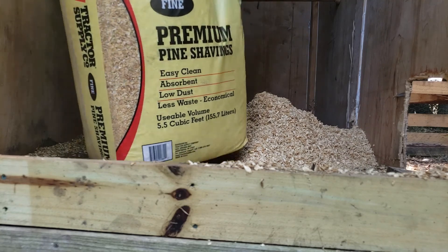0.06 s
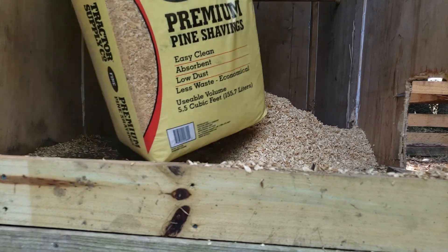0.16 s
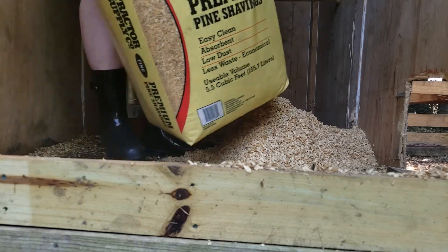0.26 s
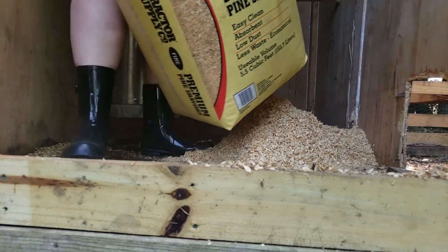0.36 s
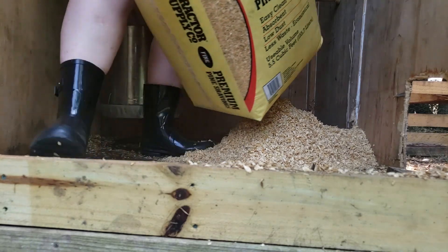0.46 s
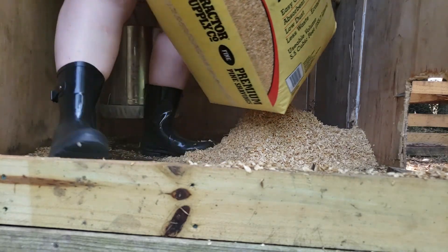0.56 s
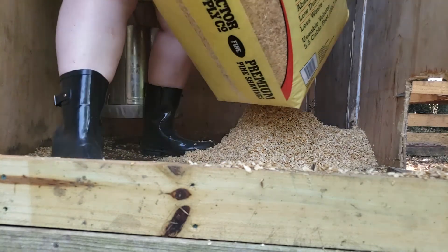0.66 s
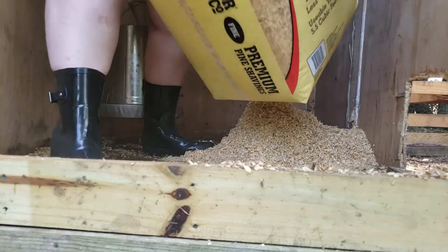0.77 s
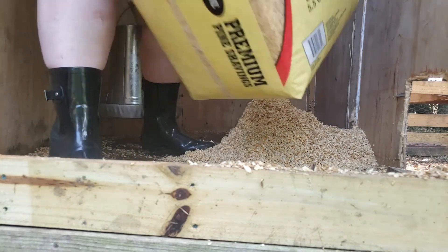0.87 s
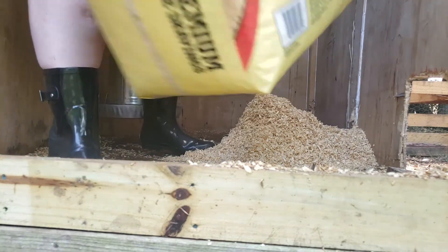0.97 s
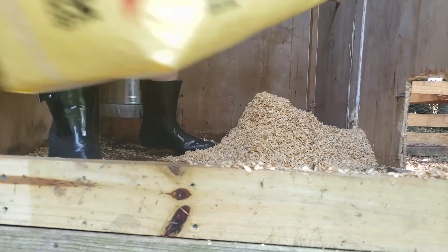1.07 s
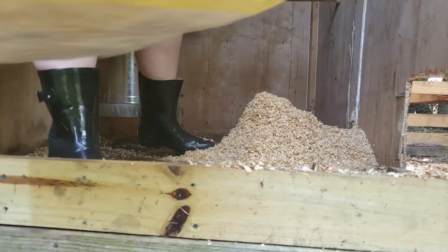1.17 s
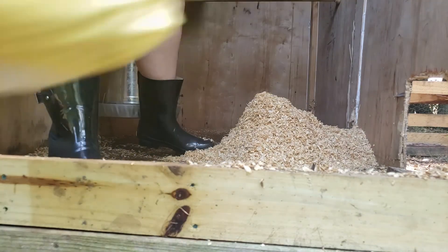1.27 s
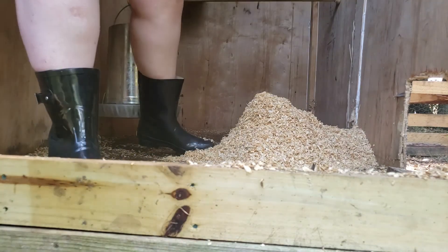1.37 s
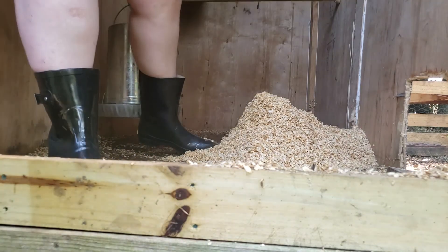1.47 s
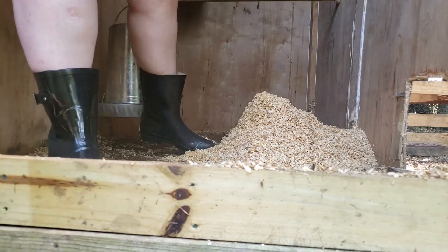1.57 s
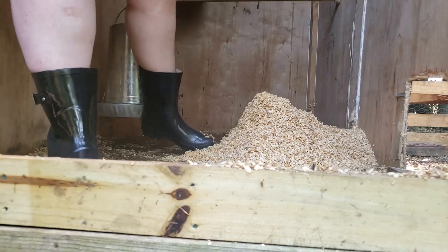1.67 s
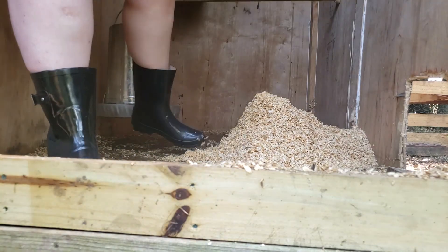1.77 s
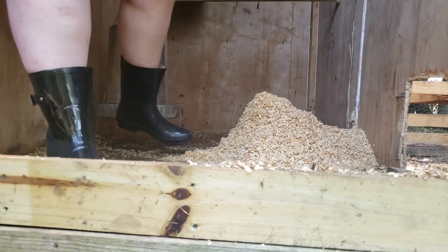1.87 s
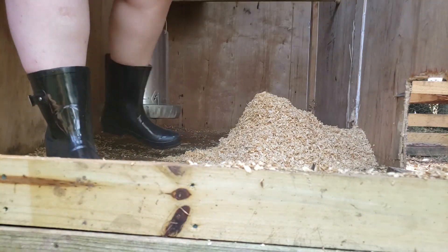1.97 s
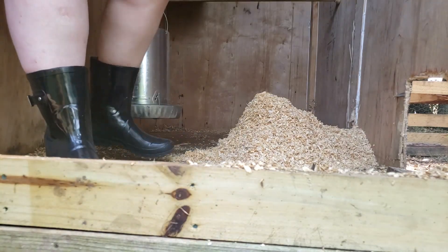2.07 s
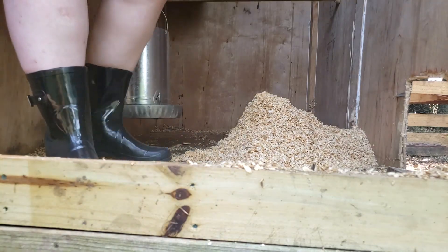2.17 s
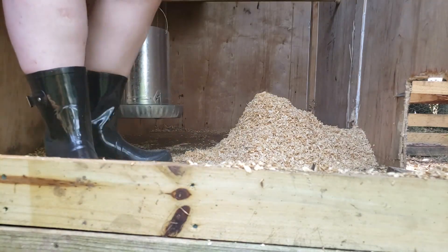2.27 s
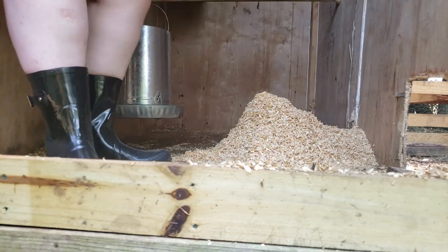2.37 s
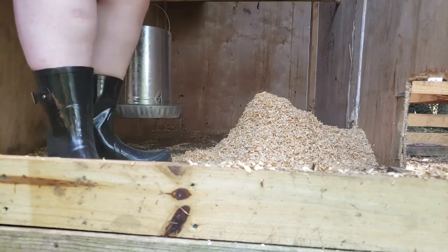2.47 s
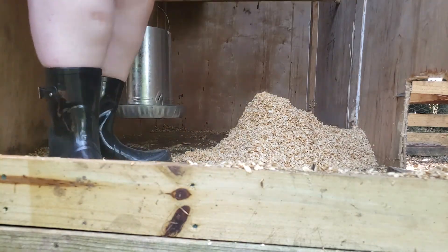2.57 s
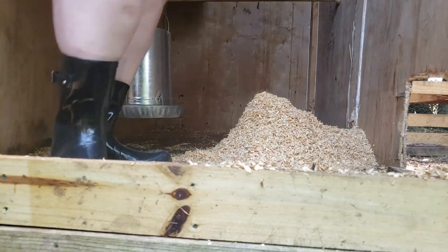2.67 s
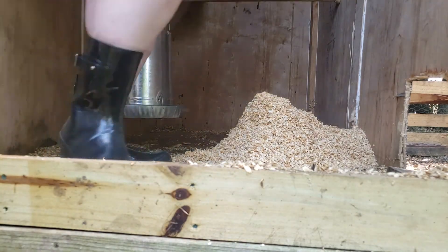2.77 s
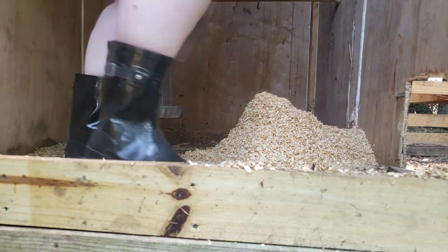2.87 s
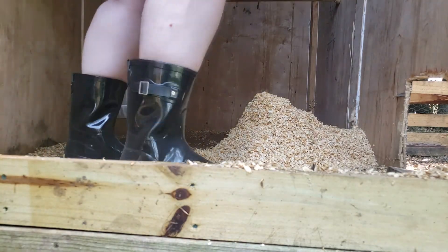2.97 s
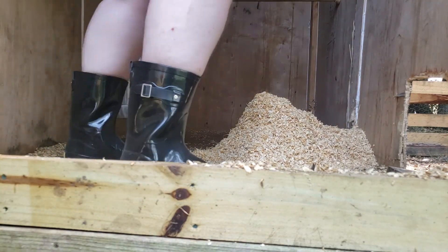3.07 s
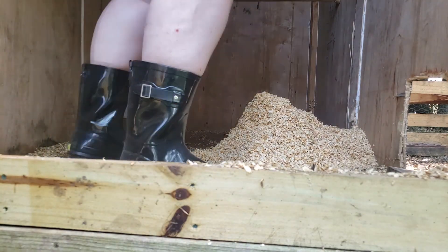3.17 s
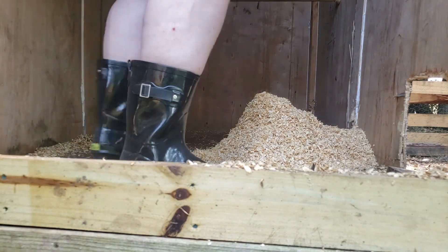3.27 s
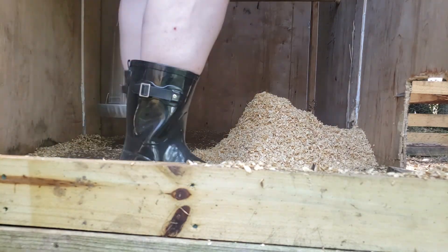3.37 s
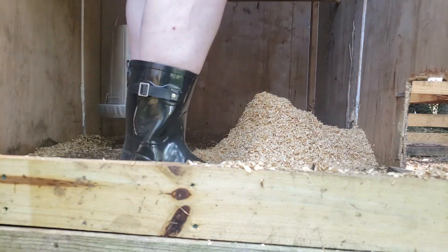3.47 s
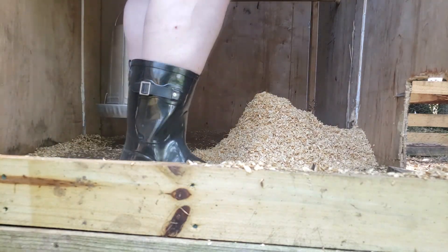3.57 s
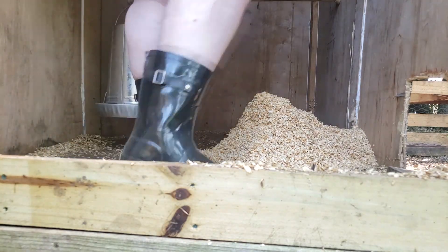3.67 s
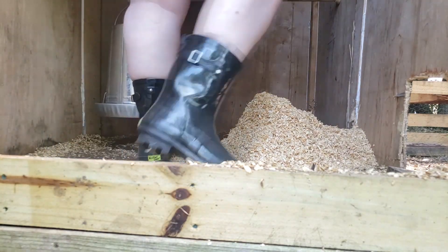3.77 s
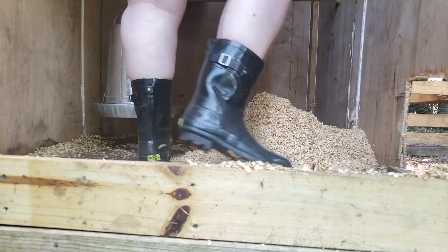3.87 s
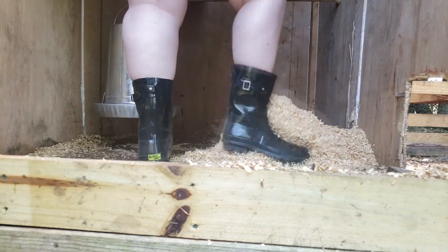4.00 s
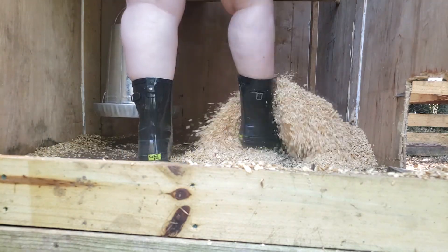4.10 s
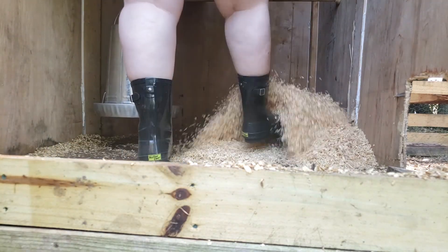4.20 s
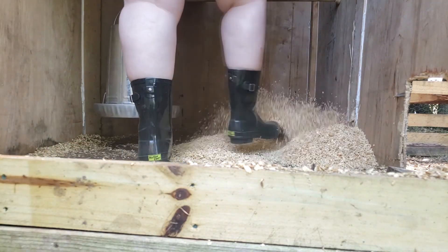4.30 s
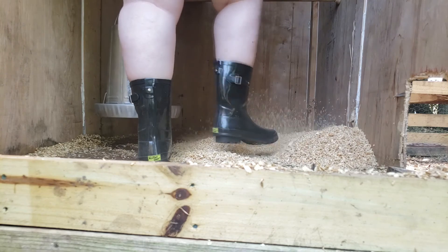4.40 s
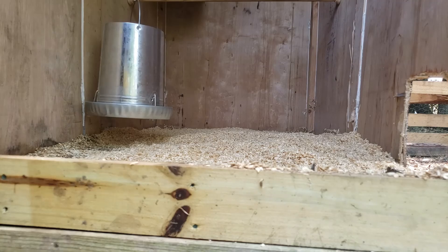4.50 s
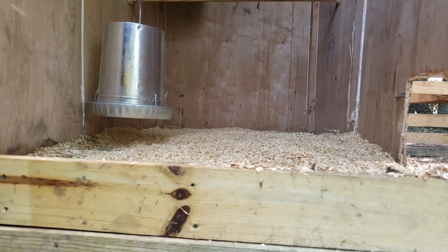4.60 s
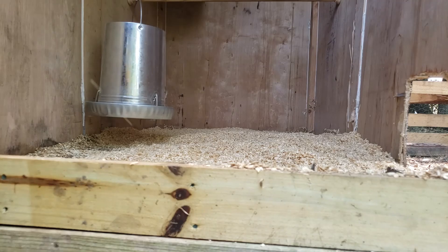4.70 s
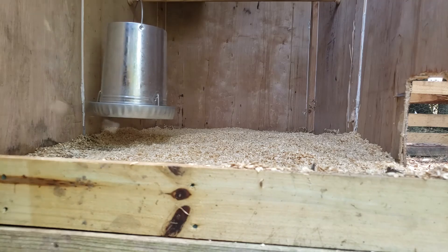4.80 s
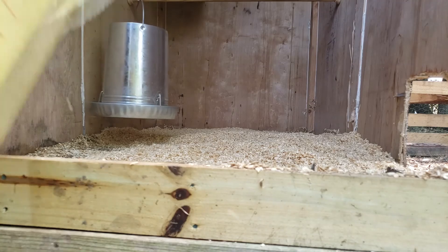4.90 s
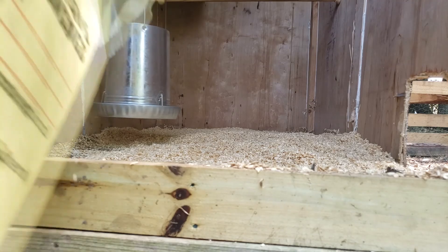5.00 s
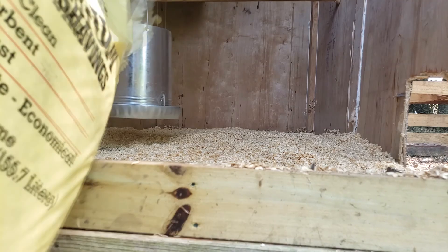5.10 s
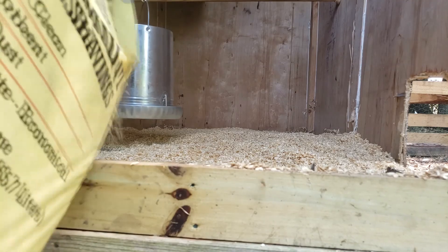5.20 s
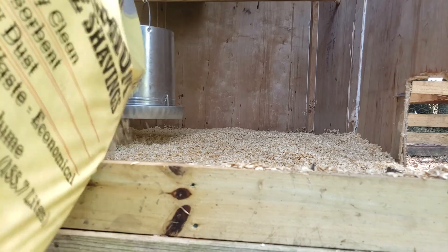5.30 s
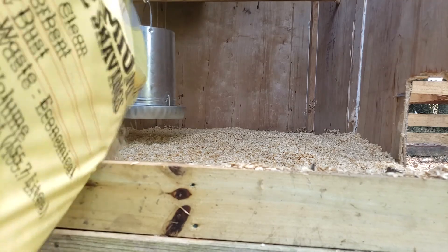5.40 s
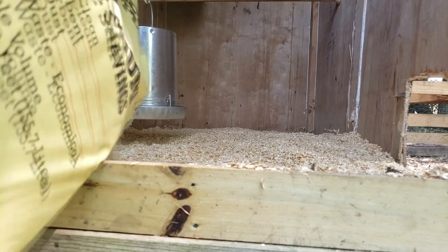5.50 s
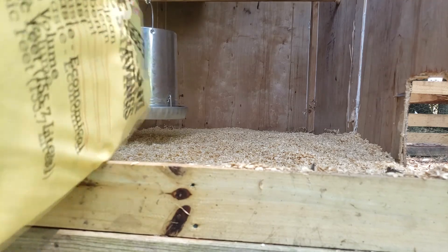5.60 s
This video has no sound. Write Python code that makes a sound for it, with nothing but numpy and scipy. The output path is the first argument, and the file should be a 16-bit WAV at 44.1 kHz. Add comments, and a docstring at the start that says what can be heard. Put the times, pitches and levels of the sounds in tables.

```python
"""A small wooden coop hums low while insects hiss far off. A plastic sack of fine shavings is lifted and
emptied: folds snap, chips rustle, and a hanging tin feeder, nudged, rings faintly. The sack is tossed
aside and thumps on the floor. The feeder rings once more as rubber boots start to step about; then they
kick the heap flat. Last, a new sack is shaken out. The left microphone port is nearer to all of it."""
import sys
import numpy as np
from scipy import signal
from scipy.fft import rfft, irfft, next_fast_len
from scipy.io import wavfile
from scipy.ndimage import uniform_filter1d, map_coordinates

SR = 44100
rng = np.random.default_rng(int(sys.argv[2]) if len(sys.argv) > 2 else 0)


def transcribe(u):
    """Save the signal u as a 16-bit wav file named by the first command-line argument.

    u: samples, shape (n,) or (channels, n), limited to [-1, 1]; the rate is SR.
    q: integer samples, one column per channel.
    """
    v = np.clip(np.atleast_2d(u).T, -1, 1)
    q = np.round(v * 32767).astype(np.int16)
    wavfile.write(sys.argv[1], SR, q)


N = 249165

# Fader rides of the low bed: (time [s], hum level [dB], floor boom level [dB])
BED_LEVELS = [(0, -45, -53), (.25, -42, -55), (.47, -45, -43), (.79, -45, -47), (1.13, -42, -55),
              (1.48, -41.5, -53), (1.9, -49, -52), (2.33, -45.5, -54.5), (2.8, -47.5, -59.5),
              (3.19, -44.5, -52), (3.65, -46, -58.5), (4.06, -42.5, -54), (4.45, -43.5, -51),
              (4.69, -41, -39), (4.85, -45, -39.5), (5.18, -49, -39), (5.4, -42.5, -46), (5.65, -50, -38.5)]
# Air modes of the coop: (frequency [Hz], width [Hz], gain [dB])
AIR_MODES = [(53.4, 9, 1.5), (104.8, 10, 1.5), (137.7, 14.6, -3), (207, 55, -26), (366, 7.1, -17.5)]
# Hollow modes of the raised floor: (frequency [Hz], width [Hz], gain [dB])
PLANK_MODES = [(330, 25, -2.5), (462, 110, 2.5), (610, 190, 2.5), (777, 55, -8)]
# Tone of the outdoor drone: (frequency [Hz], relative level [dB])
DRONE_EQ = [(20, -35), (38, 2.5), (140, -10.5), (165, -34), (300, -28.5), (600, -37), (1200, -63.5),
            (3000, -78.5)]
# Tone of the booming joists: (frequency [Hz], relative level [dB])
BOOM_EQ = [(41, -39), (70, 2), (97, 4), (140, -4), (204, -3), (232, -8), (300, -14), (390, -38),
           (660, -120)]
# Tone of the distant air: (frequency [Hz], relative level [dB])
OUTDOOR_EQ = [(290, -20), (500, 1.5), (769, -23.5), (831, -10.5), (888, -20.5), (1940, -19.5),
              (7000, -10.5), (9100, -52.5), (15400, -120)]
# Tone of the far insects: (frequency [Hz], relative level [dB])
INSECT_EQ = [(6500, -32.5), (7600, -7.5), (8700, -3.5), (9700, -5.5), (11100, -3), (12000, -9),
             (13500, -11.5), (15700, -14)]
# Tone of the floorboards: (frequency [Hz], relative level [dB])
BOARD_EQ = [(150, -9), (250, -1), (426, -5), (459, -4.5), (495, -3.5), (615, -4), (901, -6.5),
            (1500, -14.5), (1950, -24), (3300, -120)]
# Tone of coarse chips: (frequency [Hz], relative level [dB])
COARSE_EQ = [(590, -22.5), (1000, -2), (1190, -1), (1320, -3), (2310, -2.5), (3500, -5), (4550, -14.5),
             (7700, -120)]
# Tone of fine chips: (frequency [Hz], relative level [dB])
FINE_EQ = [(2060, -18), (3500, -8), (4150, -2.5), (5450, -3), (7010, -2.5), (8000, -7), (10400, -51.5),
           (17600, -120)]
# Tone of sliding dust: (frequency [Hz], relative level [dB])
DUST_EQ = [(5000, -31), (8500, -6.5), (9690, -5), (12000, -2), (15100, -2.5), (15700, -1)]
# Reverb of the plank walls: (frequency [Hz], t60 [s])
WALL_DECAY = [(200, 0.21), (2000, 0.29), (10000, 0.12)]
# Stereo likeness of the noise: (frequency [Hz], left-right correlation [0-1])
CORRELATION = [(60, 1), (290, 0.9), (700, 0.99), (1500, 0.14), (3000, 0.043), (7000, 0.072)]
# Modes of the tin feeder: (frequency [Hz], rim hit level [dB], drum hit level [dB], t60 [s])
FEEDER_MODES = [(4200, -4, -20, 2.5), (4630, 0, -14, 3), (5665, -2, -4, 4), (6285, -9, -2, 2),
                (6790, -4, -1, 2), (7192, -1, -4, 3), (7295, -3, -6, 3), (7715, -5, -7, 3)]
# Nudges of the feeder: (time [s], level [dB], spot [0 rim, 1 drum])
FEEDER_NUDGES = [(.67, -72, 0), (2.212, -74, 1)]
# Soles and sack landing: (time [s], level [dB], pitch [Hz], relative knock level [dB], t60 [s])
LANDINGS = [(0.159, -27, 137, -10.5, 0.087), (0.259, -31.5, 53.8, -3, 0.11), (0.468, -34, 118, -29.5, 0.11),
            (0.62, -32.5, 134.6, -31, 0.27), (1.269, -35.5, 59, -1, 0.11), (1.583, -21.5, 98, 0.5, 0.098),
            (1.598, -15.5, 68.6, -6, 0.12), (1.592, -21, 191, -25, 0.065), (1.611, -23, 100, -21, .07),
            (1.81, -34, 98, -10, 0.11), (2.199, -37, 51.7, -15, 0.18), (2.287, -36.5, 118.5, -13, 0.22),
            (2.499, -37, 143, -14, .11), (2.56, -33.5, 70, -5.5, 0.041), (2.628, -35.5, 99, -8, 0.14),
            (2.72, -43, 98, -2.5, 0.16), (2.916, -38.5, 93, -28, .12), (3.086, -41, 134.2, -26, 0.53),
            (3.398, -41, 136.4, -27, .15), (3.579, -42, 84, -10.5, 0.19), (3.689, -39, 51.1, -30.5, 0.089),
            (4.529, -27, 78.6, -6, 0.13), (4.64, -26.5, 91, -23, 0.12), (4.726, -35, 90.5, -13, 0.096),
            (4.849, -26, 85, -15, 0.089), (5.088, -30, 89.5, 2.5, 0.11), (5.115, -34, 200, 0, 0.083),
            (5.187, -21, 82.4, -18, 0.072), (5.299, -24, 186, -6, 0.049), (5.395, -28, 98, -26, 0.14),
            (5.47, -23, 94, -3.5, 0.062), (5.547, -24, 95, -10, 0.065), (5.578, -28, 60, -26, 0.14),
            (5.63, -12, 75, -26, 0.045)]
# Snaps of plastic and crushed chips: (time [s], level [dB], colour [Hz], relative treble level [dB])
SNAP_CUES = [(0.0512, -25, 1620, -4), (0.0761, -25, 4680, 6.5), (0.122, -35, 1550, -20),
             (0.613, -33, 3880, -24), (0.6691, -31, 6130, -16), (0.837, -29.5, 6650, -23.5),
             (1.245, -37, 6360, -23), (1.261, -33, 4930, -19), (1.2801, -28, 1550, -20.5),
             (1.3127, -36, 1646, -4.5), (1.481, -36, 6300, -16.5), (1.507, -32.5, 6500, -12),
             (1.575, -22.5, 3600, 3), (1.5891, -13.5, 1980, -10), (1.593, -10, 1990, -14.5),
             (1.5995, -10.5, 6030, -23.5), (1.6327, -17.5, 1990, -10), (1.7593, -28, 4070, -17.5),
             (1.779, -34, 2010, -7), (1.7928, -29, 4360, -0.5), (1.8203, -32.5, 2260, -16),
             (2.0748, -37, 1770, -24.5), (2.2132, -42, 2300, -16.5), (2.5623, -44.5, 2130, -4.5),
             (2.6265, -38.5, 2880, -19.5), (2.6544, -41, 3030, -14), (3.083, -44, 1500, -19),
             (3.1042, -38, 2170, -23), (3.1175, -44, 2320, -17), (3.577, -43, 2860, -20),
             (3.5854, -36.5, 1770, -16), (3.6268, -43, 1200, -25), (3.684, -38.5, 1680, -22),
             (4.497, -22, 6900, -18), (4.5199, -22, 2360, -21.5), (4.5331, -18, 2530, -23),
             (4.5617, -18.5, 4530, -7), (4.6174, -23.5, 2650, -22.5), (4.7217, -12, 6760, -17),
             (4.738, -18.5, 6500, -24), (4.7514, -28, 3260, -16), (4.7592, -18, 7200, -21),
             (4.7635, -16, 5340, -13), (4.794, -28.5, 3390, -12.5), (4.8307, -23.5, 4280, -6),
             (4.8345, -22, 3330, -7.5), (4.8566, -23.5, 5000, -3), (4.8803, -19.5, 6300, -24),
             (4.8947, -24.5, 3610, -23), (5.005, -26.5, 1750, -21), (5.0175, -25.5, 4000, -17),
             (5.0384, -21, 5200, 0.5), (5.0665, -21.5, 4380, -2), (5.0736, -19, 2280, -13.5),
             (5.1145, -31.5, 5000, 0), (5.132, -18, 4230, -12.5), (5.1674, -25.5, 4750, -17),
             (5.189, -28.5, 4850, -15.5), (5.2473, -25.5, 2480, -13), (5.3015, -18.5, 2290, -19),
             (5.5344, -23, 4960, -1), (5.632, -20, 6000, -13)]
# Swells of sack or boot; rise and fall span 20 dB and are held to at least 3 ms:
# (peak time [s], coarse level [dB], rise [s], fall [s], then over coarse: fine [dB], dust [dB], rub [dB])
MOVEMENTS = [(.01, -45.5, -0.5, 0.15, -5.5, -0.5, -2), (.08, -46.5, 0.4, 0.11, 0, 0.5, 0),
             (0.196, -49, .05, 0.2, -4.5, 2, 0), (0.253, -54, -0.33, 0.16, 2, 2, 1.5),
             (.34, -59.5, 0.9, 0.1, -1, 0.5, 1.5), (0.389, -63, -0.3, 0.75, 3.5, 6.5, -3),
             (.51, -58.5, .12, 0.34, -2, 6.5, 3.5), (0.615, -52.5, -0.1, 0.15, -8, 0, 1),
             (0.674, -52, -0.06, 0.0147, -0.5, 7, 13), (.76, -74, -2.1, .3, 1.5, 11, 12),
             (0.84, -55, 0.15, -0.03, -15, 0, 2.5), (.96, -72, 0.1, 0.5, 5, 15.5, -3),
             (1.13, -67.5, 0.25, .2, 0.5, 9, 9), (1.28, -59, 0.1, 0.05, 4, 3.5, 8),
             (1.332, -49.5, 0.12, 0.08, -6, 3.5, 1), (1.385, -51.5, 0.15, 0.13, 3, 8.5, 5),
             (1.5, -54.5, 0.12, 0.04, -3, 1.5, 2), (1.578, -36, 0.03, 0.02, -8, 3.5, 4),
             (1.594, -28, 0.0278, 0.0269, 4, 6.5, -2.5), (1.636, -32.5, 0.0465, 0.0449, -1, 0, -6.5),
             (1.679, -45.5, 0.08, .15, -5, 0, 2.5), (1.765, -55, 0.42, 0.09, -2, 3.5, -13),
             (1.879, -45, 0.14, 0.07, -3, -2, -4), (1.975, -54.5, 0.13, 0.06, -9, -7.5, -2),
             (2.022, -53.5, 0.44, 0.04, -1.5, 2.5, -3), (2.08, -63.5, 0.7, 0.35, 0, 6.5, 2),
             (2.2, -72, -0.2, 0.04, 3, 3.5, 16), (2.22, -64.5, .02, 0.16, -0.5, 3.5, 8),
             (2.45, -87.5, 0, .6, 13, 25, 6), (2.498, -69, -0.63, 0.54, -3.5, 1, 10),
             (2.565, -63.5, .015, 0.14, -5, 0, 6), (2.65, -56, 0.06, 0.07, -5, -2, -4),
             (2.73, -72.5, 0.1, 0.2, -10, 1.5, 6.5), (2.923, -58.5, -0.01, 0.12, -2, 2.5, 2),
             (3.085, -65.5, 0.07, 0.22, -12, -12, 6.5), (3.11, -58.5, 0.05, 0.17, -9, -15, 5),
             (3.41, -72, -0.1, 0.1, 2, 9.5, -9), (3.45, -72.5, 0.3, 0, -6, 5.5, -5),
             (3.584, -58.5, 0.03, 0.12, -7.5, -3, 7.5), (3.69, -67.5, 0.32, 0.3, -5, -8, 5),
             (3.769, -76.5, 0.9, -1.5, -3.5, 3, 1), (3.925, -55.5, 0.0064, 0.6, 6.5, 11.5, -3.5),
             (3.96, -47.5, 0.04, .1, 2.5, 8, -4.5), (4.01, -42.5, 0.05, 0.2, -3.5, 2.5, -3),
             (4.16, -52, 0.196, 0.9, 2.5, 7.5, -5.5), (4.268, -42.5, 0.05, .2, 2.5, 7.5, -9.5),
             (4.38, -42, 0.15, 0.12, 4.5, 10.5, -6.5), (4.465, -49.5, 0.0744, .025, 5.5, 13.5, 2),
             (4.5, -46, -0.21, -0.25, 13, -0.5, -6), (4.543, -41, 0.0662, .06, 1.5, 6, -0.5),
             (4.62, -44.5, 0, -0.1, 0, -4.5, -15), (4.681, -48.5, 0.1262, .08, 3, 11, 3.5),
             (4.73, -36.5, 0.0532, .09, -3.5, -2.5, -2), (4.836, -46, 0.12, 0.15, -5, -0.5, -4),
             (4.884, -40.5, 0.13, .11, -2, -3, 0), (5.04, -41.5, 0.11, 0.4, -1.5, 3.5, -1),
             (5.09, -43.5, 0.09, 0.14, 1, 2.5, 4), (5.168, -44.5, 0.16, 0.18, 0.5, 1.5, 5.5),
             (5.26, -48.5, 0.26, 0, 0, 6, 4), (5.3, -40, 0.02, 0.1, -20, -7.5, 1),
             (5.34, -58, 0.2, 0.5, 6.5, 9, -1), (5.41, -42.5, -0.25, -0.03, -11, -4.5, -2),
             (5.47, -48, 0.26, 0.03, 1, 8, 1.5), (5.54, -45.5, 0.18, 0.3, -1.5, 3, -1),
             (5.626, -43.5, 0.17, .08, -1, -2, 3)]
# Where the shavings are stirred: (time [s], left over right [dB])
STIR_PAN = [(0, 4.5), (.85, 5), (1, 8), (1.4, 3), (1.55, 8.5), (2, 9), (2.4, 5.5), (3.1, 5.5), (3.3, 6),
            (4.04, 4), (4.67, 5), (5.65, 4.5)]
# Loose shavings slide smoothly, stiff plastic jerks: (time [s], jerkiness [0-1])
JERKINESS = [(0, .6), (1.2, .6), (1.75, .5), (2.1, .3), (3.85, .3), (3.9, .08), (4.47, .08), (4.5, .9),
             (4.95, .9), (5.3, .6), (5.65, .6)]

LEAD_S = 12 / SR  # the left port hears first
TOP_HZ = 15760


def amp(db):
    return 10 ** (np.asarray(db) / 20)


def unit(x):
    return x / np.sqrt(np.mean(x ** 2) + 1e-20)


def along(points, hz):
    """(Hz, value) points on a log axis."""
    f, v = np.transpose(points)
    return np.interp(np.log(hz + 1), np.log(f + 1), v)


def curves(rows):
    """One value per sample for each column after the time."""
    s, *cols = np.transpose(rows)
    return [np.interp(np.arange(N) / SR, s, c) for c in cols]


def wobble(rate):
    """A smooth random curve, rate knots a second."""
    return map_coordinates(rng.standard_normal(N // 100), [np.arange(N) * rate / SR])


def filtered(x, response):
    """x times a complex response of frequency."""
    m = next_fast_len(x.shape[-1] + min(8192, 3 * x.shape[-1]))
    return irfft(rfft(x, m) * response(np.fft.rfftfreq(m, 1 / SR)), m)[..., :x.shape[-1]]


def resonance(f, hz, width):
    return 1j * f * width / (hz * hz - f * f + 1j * f * width)


def eq_curve(points):
    return lambda hz: amp(along(points, hz))


def sides(left_db):
    """Left and right gain rows whose mean is 1."""
    pair = amp(np.vstack([left_db / 2, -left_db / 2]))
    return 2 * pair / pair.sum(0)


def spread(pair, colour, lead_s=LEAD_S):
    """Colour two unrelated signals and blend them into partly alike channels of overall rms 1."""
    size = next_fast_len(pair.shape[1] + 8192)
    hz = np.fft.rfftfreq(size, 1 / SR)
    mid, side = rfft(pair, size)
    angle = np.arccos(along(CORRELATION, hz)) / 2
    sign = np.array([[1], [-1]])
    blend = np.cos(angle) * mid + sign * np.sin(angle) * side
    time_shift = np.exp(1j * np.pi * hz * lead_s * sign)
    return unit(irfft(blend * colour(hz) * time_shift, size)[:, :pair.shape[1]])


def spread_noise(colour, lead_s=LEAD_S, length=N):
    return spread(rng.standard_normal((2, length)), colour, lead_s)


def outdoor_hiss():
    """Distant air and insects make a smooth, nearly steady hiss."""
    air = amp(-75.5 + .4 * wobble(4.9)) * spread_noise(eq_curve(OUTDOOR_EQ), lead_s=0)
    insects = amp(-62 + .4 * wobble(4.3)) * spread_noise(eq_curve(INSECT_EQ), lead_s=0)
    return air * sides(10) + insects * sides(2)


def air_colour(f):
    """The enclosed air lifts a few low bands."""
    return np.abs(sum(amp(db) * resonance(f, hz, width) ** 2 for hz, width, db in AIR_MODES))


def coop_hum(rub_gain):
    """Outdoor drone swells in the coop's air modes; the joists boom under weight and with every rub."""
    hum_db, boom_db = curves(BED_LEVELS)
    hum_gain = amp(hum_db + 1.9 * wobble(7.4))
    hum = spread_noise(lambda f: amp(along(DRONE_EQ, f)) + 1.06 * air_colour(f), LEAD_S / 3)
    boom_gain = np.hypot(amp(boom_db), rub_gain) * amp(1.2 * wobble(7.2))
    boom = spread_noise(lambda f: amp(along(BOOM_EQ, f)) * (1 + .38 * air_colour(f)))
    return (hum_gain * hum + boom_gain * boom) * sides(3.8)


def walls(send):
    """The plank walls answer with a short tail, each frequency dying at its own speed."""
    hz, t, spectrum = signal.stft(rng.standard_normal((2, SR // 3)), SR, nperseg=256)
    decay = amp(-60 * t / along(WALL_DECAY, hz)[:, None])
    tail = signal.istft(spectrum * decay, SR, nperseg=256)[1]
    predelayed = np.pad(send, ((0, 0), (200, 0)))
    return signal.fftconvolve(predelayed, tail / np.linalg.norm(tail[0]), axes=1)[:, :N]


def feeder():
    """Thin sheet metal sings on after each nudge, wavering as it swings, until it is damped."""
    out, t = np.zeros((2, N + SR)), np.arange(SR * 3 // 5) / SR
    for start, db, on_drum in FEEDER_NUDGES:
        damping = np.clip((1 if on_drum else 3) * (1 - t / t[-1]), 0, 1)
        for hz, rim_db, drum_db, t60 in FEEDER_MODES:
            phase = rng.uniform(0, 2 * np.pi, (2, 1)) + np.cumsum(.017 * rng.standard_normal(len(t)))
            ring_gain = amp(db + (drum_db if on_drum else rim_db) - 60 * t / t60) * damping
            out[:, round(start * SR):][:, :len(t)] += ring_gain * np.sin(2 * np.pi * hz * t + phase)
    return out[:, :N] * sides(12)


def board_colour(f):
    """The floor's broad tone with the planks' modes standing out."""
    planks = sum(amp(db) * resonance(f, hz, width) for hz, width, db in PLANK_MODES)
    return amp(along(BOARD_EQ, f)) * (1.7 + np.abs(planks))


def thuds(joist_hz=203, joist_db=-11, crunch_db=-29.5):
    """A soft landing swings the floor for a few cycles, rings a joist, knocks boards and crushes chips."""
    out, t = np.zeros((2, N + SR)), np.arange(SR // 4) / SR
    hit_shape = lambda t60, attack_s: amp(-60 * t / t60) * (1 - np.exp(-t / attack_s))
    for start, db, hz, knock_db, t60 in LANDINGS:
        swing = np.sin(2 * np.pi * hz * t) + amp(joist_db) * np.sin(2 * np.pi * joist_hz * t)
        swing *= hit_shape(t60, .00082)
        knock = amp(knock_db) * spread_noise(board_colour, length=len(t)) * hit_shape(.27 * t60, .001)
        crunch = amp(crunch_db) * spread_noise(eq_curve(COARSE_EQ), length=len(t)) * hit_shape(.12, .002)
        left_db = 3 + 2.2 * max(db + 22, 0)  # the loudest land nearer the left port
        out[:, round(start * SR):][:, :len(t)] += amp(db) * sides(left_db) * (swing + knock + crunch)
    return out[:, :N]


def crackle_cues(rustle_gain, jerkiness, count, lift_db=7, range_db=10):
    """Cues for small snaps at chance moments, louder with more rustle and stiffer material."""
    when, size, colour, treble = rng.random((count, 4)).T
    at = (when * N).astype(int)
    db = 20 * np.log10(rustle_gain[at] * jerkiness[at]) + lift_db + range_db * size
    return list(zip(at / SR, db, 1600 * 4.5 ** colour, -24 + 18 * treble))


def snaps(cues):
    """Each buckling fold or crushed chip is a millisecond burst with its own colour."""
    out, t = np.zeros((2, N + SR)), np.arange(600) / SR
    unit_peak = lambda x: x / np.abs(x).max(1, keepdims=True)
    for start, db, hz, treble_db in cues:
        burst = rng.standard_normal((2, len(t))) * t * np.exp(-t / .00039)
        burst[1] = np.roll(.22 * burst[0] + 3.1 * burst[1], round(LEAD_S * SR))  # the right side lags
        body = filtered(burst, lambda f: resonance(f, hz, .45 * hz) + .3 * resonance(f, 1800, 4000))
        treble = filtered(burst, lambda f: resonance(f, 11800, 6000) ** 2)
        snap = unit_peak(body) + amp(treble_db) * unit_peak(treble)
        left_db = 16 + .16 * db + 3 * rng.standard_normal()  # fainter ones lie further from the left port
        out[:, round(start * SR):][:, :len(t)] += amp(db) * sides(left_db) * snap
    return out[:, :N]


def stirring(bend=1.2):
    """Coarse, fine, dust and rub gains: each move is a round-topped swell, and they add in power."""
    t, power = np.arange(N) / SR, np.zeros((4, N))
    for peak, db, rise, fall, fine_db, dust_db, rub_db in MOVEMENTS:
        rise, fall = max(rise, .003), max(fall, .003)
        span = slice(max(round((peak - 3 * rise) * SR), 0), round((peak + 3 * fall) * SR))
        from_peak = np.maximum((peak - t[span]) / rise, (t[span] - peak) / fall)
        swell_db = db - 20 * from_peak ** bend
        power[:, span] += amp(swell_db + np.c_[[0, fine_db, dust_db, rub_db]]) ** 2
    return np.sqrt(power + 1e-14)


def slips(jerkiness, per_second, t60):
    """Folds and clumps let go suddenly and run out: a gain that jumps and decays around rms 1."""
    starts = (rng.random(N) < per_second / SR) * rng.random(N)
    run_out = signal.lfilter([1], [1, -amp(-60 / (t60 * SR))], starts)
    jumps = 1 + 2.95 * jerkiness * run_out
    return jumps / np.sqrt(np.abs(uniform_filter1d(jumps ** 2, SR // 8)))


def grains(colour, density, spike_db):
    """Tiny contacts of many sizes over a smooth bed; stiff plastic fires more than loose shavings."""
    spikes = amp(spike_db * rng.random(N))
    fires = rng.random(N) < density * (.3 + curves(JERKINESS)[0])
    return spread(rng.standard_normal((2, N)) * (1 + spikes * fires), colour)


def shavings(gains, jerkiness):
    """Chips tumble and rustle, dust hisses, the rubbed boards rumble; clumps make it all flutter."""
    coarse_gain, fine_gain, dust_gain, rub_gain = gains
    clumps = amp(.26 * wobble(30)) * slips(jerkiness, per_second=82, t60=.016)
    coarse = coarse_gain * amp(.8 * wobble(50)) * grains(eq_curve(COARSE_EQ), density=.004, spike_db=19)
    fine = fine_gain * amp(.6 * wobble(60)) * grains(eq_curve(FINE_EQ), density=.004, spike_db=21)
    dust = dust_gain * amp(.67 * wobble(60)) * grains(eq_curve(DUST_EQ), density=.00099, spike_db=8)
    rub = rub_gain * amp(1.68 * wobble(25)) * grains(board_colour, density=.0019, spike_db=17)
    return clumps * sides(curves(STIR_PAN)[0]) * (coarse + fine + dust + rub)


def scene():
    """Hits and shavings play up front and feed the wall reverb, over feeder, hum and outdoor hiss."""
    gains = stirring()
    coarse_gain, _, _, rub_gain = gains
    jerkiness = curves(JERKINESS)[0]
    hits = snaps(SNAP_CUES + crackle_cues(coarse_gain, jerkiness, count=45)) + thuds()
    rustle = shavings(gains, jerkiness)
    wall_tail = walls(amp(-11) * hits + amp(-18) * rustle)
    return hits + rustle + wall_tail + feeder() + coop_hum(rub_gain) + outdoor_hiss()


def record(dry):
    """The microphone rolls off the deep bass, and the top is cut hard at TOP_HZ."""
    return filtered(dry, lambda hz: (hz < TOP_HZ) * (1j * hz / (28 + 1j * hz)) ** 2)


dry = scene()
out = record(dry)
transcribe(out)
```